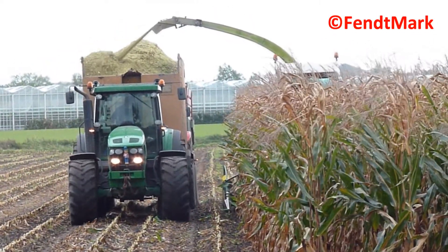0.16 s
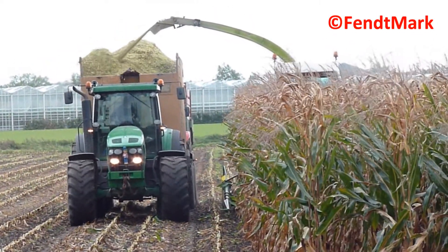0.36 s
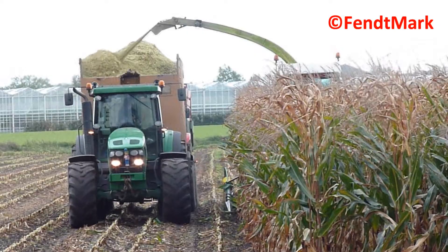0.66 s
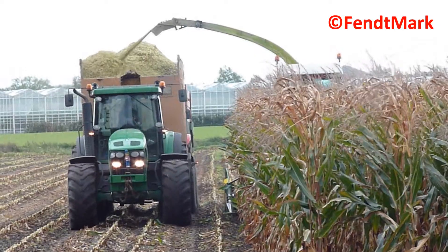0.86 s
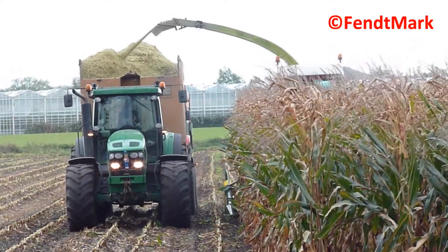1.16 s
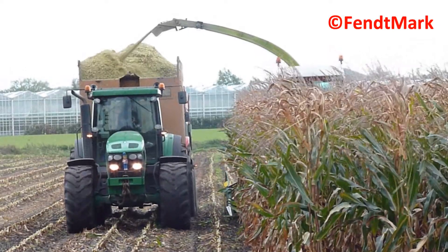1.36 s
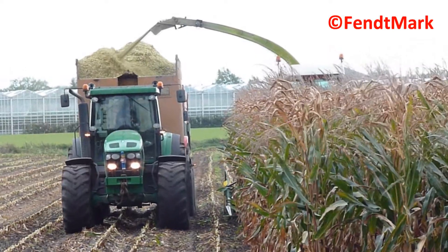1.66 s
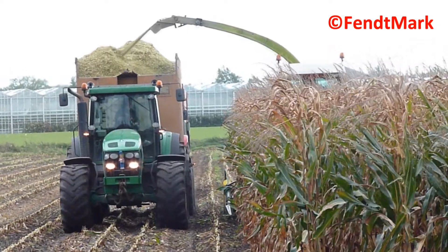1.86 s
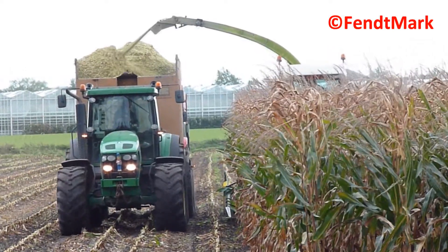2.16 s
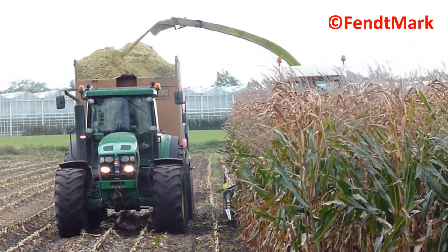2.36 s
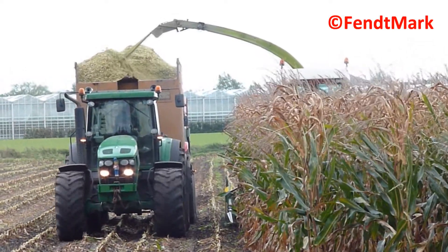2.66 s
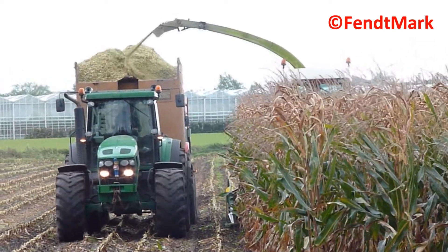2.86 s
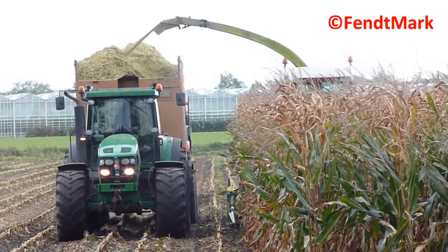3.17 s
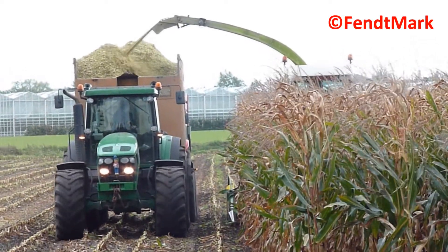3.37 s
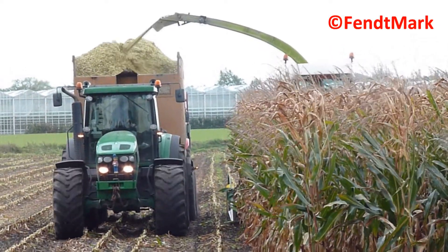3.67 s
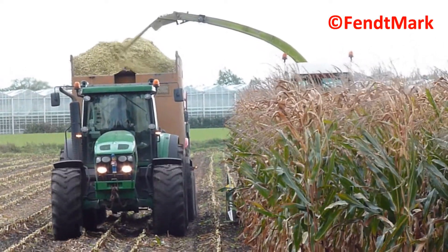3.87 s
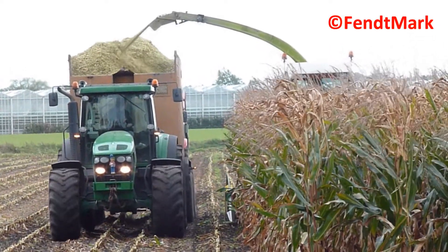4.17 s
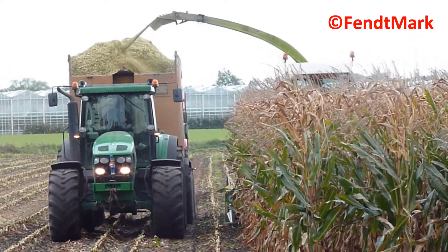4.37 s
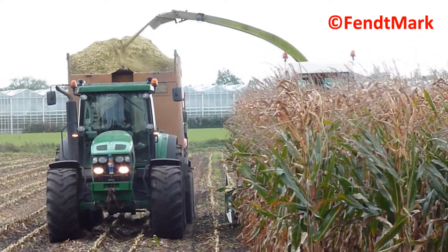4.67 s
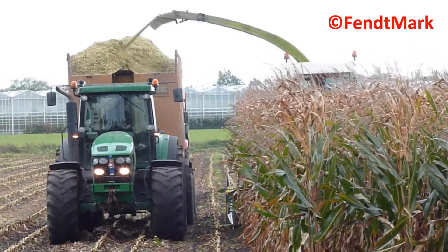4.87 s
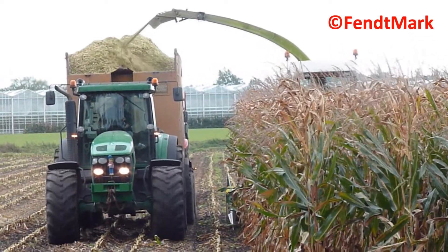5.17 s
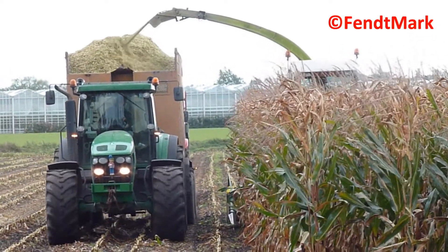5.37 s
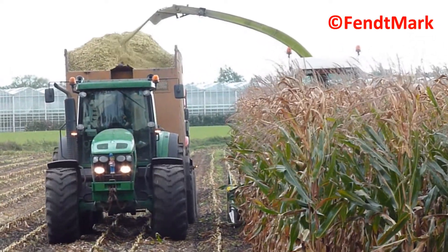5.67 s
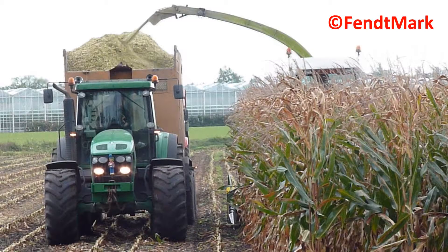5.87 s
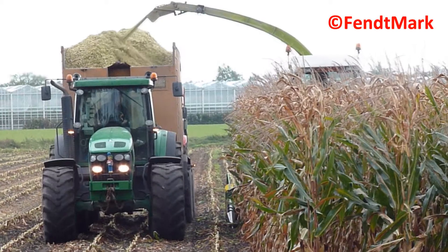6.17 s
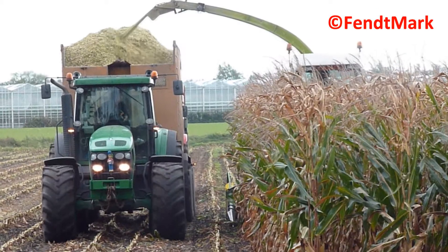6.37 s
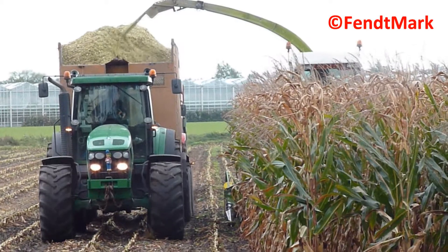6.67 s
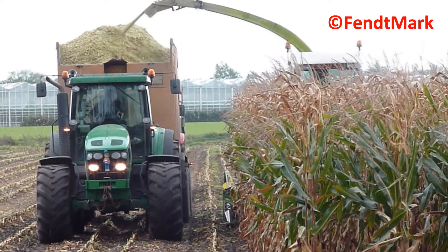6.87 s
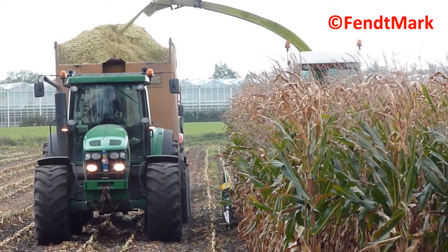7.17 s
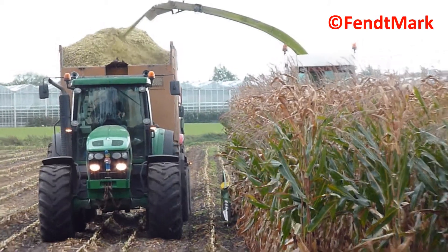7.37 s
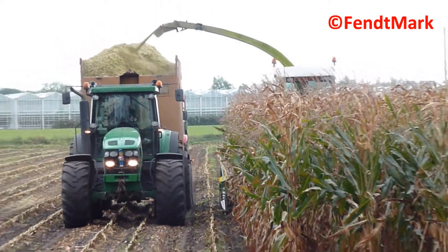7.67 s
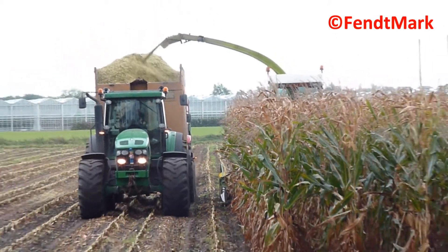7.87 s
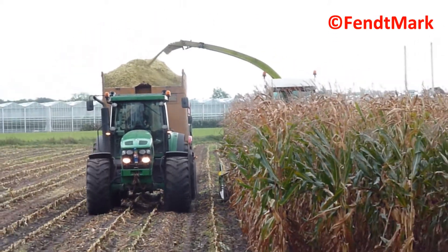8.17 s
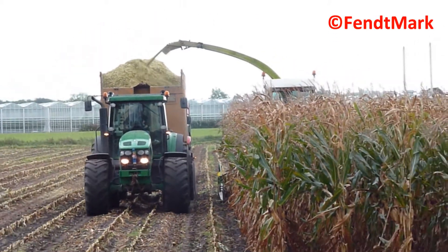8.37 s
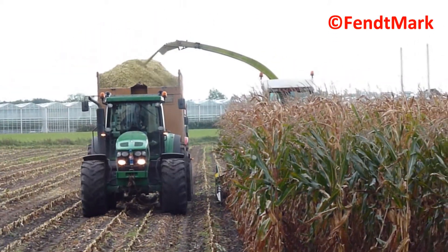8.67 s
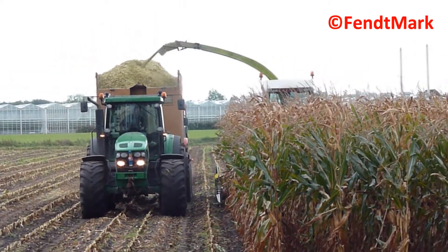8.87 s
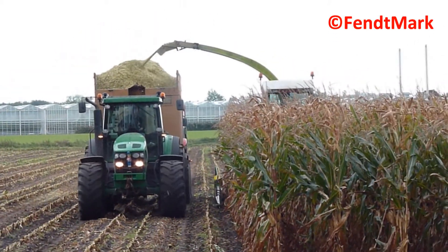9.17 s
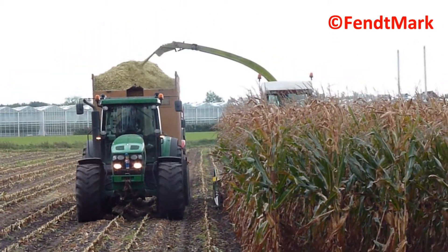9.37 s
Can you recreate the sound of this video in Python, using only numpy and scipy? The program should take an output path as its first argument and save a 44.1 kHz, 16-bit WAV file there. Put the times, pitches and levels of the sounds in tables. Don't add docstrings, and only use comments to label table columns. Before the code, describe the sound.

From 0 s a forage harvester runs at full load beside a tractor, with no pause or fade. The main whine, near 450 Hz, sits over a fluttering tone an octave lower, engine hum and a broad low-mid roar. Chains and panels clatter, while chopped maize hisses in the spout with a narrow, airy ring. Two dull cob knocks strike at about 1.3 and 1.6 s. Thick mouthfuls swell the whine, strongly at 3.2 s and repeatedly around 3.9-5.2 s, the pitch sagging slightly; the spout ring peaks near 3.1 s. Further, mostly softer knocks fall at 5.3, 5.6, 6.1 and 6.5 s, with another strong swell at 6.2 s. The spout ring thins around 7.5-8 s, then high knife overtones sing from about 8.3 s to 9 s. Noise grows gradually to the end at roughly 9.5 s as the machines approach. Open field, small stereo microphone, limited bass and treble.

```python
import sys
import numpy as np
from scipy import signal
from scipy.fft import rfft, irfft
from scipy.io import wavfile
from scipy.ndimage import uniform_filter1d

SR = 44100
rng = np.random.default_rng(int(sys.argv[2]) if len(sys.argv) > 2 else 0)


def gain_from_db(level_db):
    decades = np.asarray(level_db, float) / 20
    return 10 ** decades


def wav_record(signal):
    frames = np.transpose(np.atleast_2d(signal))
    bounded = np.clip(frames, -1, 1)
    quanta = np.round(bounded * 32767).astype(np.int16)
    wavfile.write(sys.argv[1], SR, quanta)


N = 420273
CUTS_PER_CRANK = 7.47

# (t/s, length/s, gain/dB)
MOUTHFULS = [(.75, 0.52, 4), (1.5, 0.12, 3.5), (2.2, 0.43, 3.5), (3.2, 0.46, 7), (3.62, 0.17, 4.5),
             (3.92, 0.21, 7), (4.2, 0.29, 6), (4.55, 0.37, 4.5), (4.92, 0.23, 6), (5.17, 0.28, 6),
             (5.55, .4, 3.5), (6.24, 0.19, 8), (6.48, 0.26, 4), (6.85, .15, 3.5), (7.2, .2, 4.5),
             (7.62, .12, 5.5), (7.88, 0.25, 6), (8.22, .35, 4.5), (8.63, .12, 5), (8.84, .12, 7),
             (9.37, 0.18, 3.5)]


def evened(x):
    return x / np.sqrt(np.mean(abs(x) ** 2) + 1e-20)


def read(points, hz):
    f, *values = np.transpose(points)
    return [np.interp(np.log(hz + 1), np.log(f + 1), v) for v in values]


def along(rows):
    s, value = np.transpose(rows)
    return np.interp(np.arange(N) / SR, s, value)


def swells(rows):
    t = np.arange(0, N, 64) / SR
    db = sum(gain_db * np.exp(-(2 * (t - s) / length) ** 2) for s, length, gain_db in rows)
    return np.interp(np.arange(N) / SR, t, db)


def wander(hz):
    z = rfft(rng.standard_normal(N))
    return evened(irfft(z * np.exp(-(np.fft.rfftfreq(N, 1 / SR) / hz) ** 2), N))


def tone(turns, db, rough, rough_hz):
    shake = evened(1 + rough * (wander(rough_hz) + 1j * wander(rough_hz)))
    carrier = np.exp(2j * np.pi * (turns + rng.random()))
    return gain_from_db(db) * np.sqrt(2) * (shake * carrier).real


def wash(colour, patchy_db, size=1024):
    # (f/Hz, likeness/0-1, left lead/rad, left-right level/dB)
    ports = [(450, 1, -.12, 0), (900, 0.98, 0.12, -0.3), (1700, 0.95, -0.18, -2), (2500, 0.87, 0.12, -1),
             (2930, .65, 0.82, 2), (3080, 0.97, 0.51, 10.5), (3236, .45, -0.95, 4.5), (3600, .8, -0.56, 0),
             (3750, 0.98, -1, 3.5), (3850, 0.6, -1.2, 6), (4380, 0.3, 0.013, -2.5), (5000, 0.9, -0.68, 2.5),
             (6200, .91, -1, 2), (7840, 0.4, -1.46, -1)]
    hop = size // 4
    frames, hz = N // hop + 5, np.fft.rfftfreq(size, 1 / SR)
    a, b, c, d, patches = rng.standard_normal((frames, len(hz), 5)).T
    patches = uniform_filter1d(patches, size=12, axis=0)
    patches = evened(uniform_filter1d(patches, size=12, axis=1))

    same, lead, tilt_db = (v[:, None] for v in read(ports, hz))
    apart = (hz ** 3 / (hz ** 3 + 750 ** 3))[:, None]
    same = 1 - apart * (1 - np.clip(same, 0, 1))
    left = a + 1j * b
    right = same * left + np.sqrt(1 - same ** 2) * (c + 1j * d)
    port = gain_from_db(apart * tilt_db / 2) * np.exp(.5j * apart * lead)
    z = np.array([left * port, right / port])
    z *= gain_from_db(read(colour, hz)[0][:, None] + patchy_db * patches)
    return evened(signal.istft(z, nperseg=size, noverlap=size - hop)[1][:, :N])


def knife_turns():
    # (t/s, second knife harmonic f/Hz)
    speed = [(.2, 445.5), (.65, 453), (1.1, 453), (1.65, 445.2), (2.25, 451), (2.7, 458.5), (3.1, 451.5),
             (3.5, 454.3), (3.95, 451.5), (4.25, 456), (4.7, 457.8), (4.95, 456), (5.4, 460.9),
             (5.85, 455.5), (6.2, 451), (6.7, 452.5), (8.55, 448.7), (9.05, 456)]
    sag_hz_per_db = 0.5
    hz = along(speed) - sag_hz_per_db * swells(MOUTHFULS)
    return np.cumsum(uniform_filter1d(hz, size=8000)) / SR / 2


def tractor_tones():
    # (order of the engine cycle, level/dB)
    orders = [(5, -91), (6, -79), (7, -66), (8, -58), (10, -59.5)]
    cycle_hz = 16.65
    turns = np.cumsum(cycle_hz * (1 + 0.00291 * wander(0.43))) / SR
    return sum(tone(order * turns, db, 0.15, 1.9) for order, db in orders)


def roar(flow_db, near_db, bites):
    # (f/Hz, density/dB per Hz)
    colour = [(45, -62), (70, -43.5), (110, -18), (180, 0), (226, 4.5), (270, 0), (315, -5), (395, 5),
              (440, 4.5), (480, -4), (520, 2.5), (685, 3.5), (860, -1.5), (1100, -33.5)]
    level_db = -33 + 0.34 * flow_db + 0.63 * near_db + 0.5 * bites
    return gain_from_db(level_db) * wash(colour, 1.4, size=4096)


def clatter(flow_db, near_db, bites):
    # (f/Hz, density/dB per Hz)
    colour = [(700, -26), (900, 0.5), (1100, -2), (1400, -0.5), (1700, -7), (2050, -10), (2300, -16),
              (2600, -19.5), (3000, -39)]
    level_db = -40.97 + flow_db + near_db + 0.64 * bites
    return gain_from_db(level_db) * wash(colour, 0.86)


def crop_hiss(flow_db, near_db, bites):
    # (f/Hz, density/dB per Hz)
    colour = [(2200, -27.5), (2700, -8), (3080, -3), (3400, -4.5), (3750, -2), (4200, -2.5), (5000, -2),
              (5800, -2), (6200, -1), (6900, -3), (7400, -6), (7700, -14.5), (7850, -20.5), (8100, -22.5)]
    level_db = -49 + flow_db + 0.6 * near_db + 0.64 * bites
    return gain_from_db(level_db) * wash(colour, 1.1)


def spout_ring(flow_db):
    # (f/Hz, density/dB per Hz)
    colour = [(3200, -31), (3550, -7.5), (3780, -1), (4000, -8.5), (4400, -32)]
    # (t/s, length/s, gain/dB)
    lumps = [
        (.67, .2, 3),
        (2.35, 0.23, 5),
        (3.12, .4, 8),
        (4.1, 0.34, 5.5),
        (5.2, 0.24, 3),
        (6.05, .2, 4.5),
        (7.5, .3, -6),
        (8.03, .2, -8),
    ]
    return gain_from_db(-59 + 0.9 * flow_db + swells(lumps)) * wash(colour, 0.64)


def machine_noise():
    # (t/s, level/dB re usual)
    feed = [(0, 0.5), (.7, 1.5), (1.1, 1), (1.35, -1), (1.6, 0.5), (1.88, -2.5), (2.15, 0), (3.1, 0.5),
            (3.45, -.5), (4.15, 1), (4.62, -2), (5.0, 0.5), (5.5, 1.5), (5.7, 0), (7.25, 1), (7.55, -1.5),
            (7.9, 1), (9.53, .5)]
    flow_db = along(feed)
    near_db = 0.23 * np.arange(N) / SR
    bites = wander(35)
    knife = 2 * np.pi * knife_turns()
    throb = 0.04 * np.cos(knife) + 0.045 * np.cos(2 * knife / CUTS_PER_CRANK)
    upper = clatter(flow_db, near_db, bites) + crop_hiss(flow_db, near_db, bites) + spout_ring(flow_db)
    return roar(flow_db, near_db, bites) + (1 + throb) * upper


def knocks():
    # (t/s, peak level/dB)
    cobs = [
        (1.295, -17),
        (1.607, -18),
        (5.26, -17.5),
        (5.56, -22.5),
        (6.08, -22.5),
        (6.537, -23),
    ]
    ring_hz, t60_s, gain_db = 640, 0.018, 2
    t, blows = np.arange(2000) / SR, np.zeros(N)
    for s, db in cobs:
        blows[round(s * SR)] = gain_from_db(db + gain_db)
    onset = np.minimum(t / 0.0017, 1)
    ring = np.sin(2 * np.pi * ring_hz * t) * gain_from_db(-60 * t / t60_s) * onset
    return signal.oaconvolve(blows, ring)[:N]


def harvester_tones():
    # (crank order, level/dB)
    engine = [(2, -73.5), (3, -85), (5, -61.5), (6, -56), (10, -48.5), (11.25, -58), (13, -55)]
    # (t/s, length/s, gain/dB)
    beats = [(.05, .25, -11), (.32, 0.13, 2.5), (.6, 0.29, -23), (.8, .1, 7.5), (1.0, 0.086, -6.5),
             (1.3, 0.089, -0.5), (1.75, 0.5, 4.5), (2.11, 0.16, -15), (2.8, 0.091, 4.5), (3.15, 0.17, -5),
             (3.6, 0.76, 3), (4.07, 0.21, -21), (4.58, .3, 5), (4.97, 0.19, -4), (5.38, .15, -11),
             (5.57, .18, 6), (6.12, .1, -5), (6.7, 0.62, 2), (7.22, .15, -18), (7.48, 0.2, 7.5),
             (7.82, .15, -5), (8.63, 0.079, -6.5), (8.83, 0.097, -10), (9.1, 0.18, 2), (9.38, 0.19, -6.5)]
    # (t/s, length/s, gain/dB)
    third = [(.4, .35, 12.5), (1.0, .4, 5), (1.6, 0.39, 5), (2.7, 0.42, 6.5), (4.05, 0.27, 8), (4.6, .4, 6),
             (5.05, .3, 9), (5.45, .45, 13), (6.25, 0.25, 7), (6.9, 0.46, 7), (8.6, 0.61, 10.5),
             (9.2, .5, 10)]
    fifth = [
        (1.45, .5, 4),
        (2.4, 0.98, 9.8),
        (3.45, 1.1, 11.8),
        (4.6, .7, 8),
        (5.25, 0.57, 10),
        (7.3, .4, 7),
        (8.3, 1.2, 11),
    ]
    sixth = [
        (.6, .5, 5),
        (2.1, .5, 4),
        (4.95, .5, 7.7),
        (5.9, .5, 5),
        (7.2, 1.2, 8),
        (8.3, 0.71, 11),
        (8.95, 0.63, 11),
    ]
    knife = knife_turns()
    out = tone(knife, -37 + swells(beats), 0.28, 16)
    out += tone(2 * knife, -33 + swells(MOUTHFULS), 0.14, 14)
    out += tone(3 * knife, -48 + swells(third), 0.52, 12)
    out += tone(5 * knife, -58 + swells(fifth), 0.63, 12)
    out += tone(6 * knife, -60.3 + swells(sixth), 0.41, 15)
    return out + sum(tone(order * knife / CUTS_PER_CRANK, db, 0.17, 3.0) for order, db in engine)


def scene():
    ahead = tractor_tones() + knocks() + harvester_tones()
    lean = signal.sosfiltfilt(signal.butter(2, 330, "high", fs=SR, output="sos"), ahead)
    return machine_noise() + ahead + gain_from_db(-27.5) * np.array([-lean, lean])


def low_pass(x):
    return signal.sosfilt(signal.butter(12, 8260, fs=SR, output="sos"), x)


def record(dry):
    # (f/Hz, width/Hz)
    notches = [(2600, 255), (4600, 710), (5428, 350), (7905, 800)]
    dry = signal.sosfilt(signal.butter(4, 52, "high", fs=SR, output="sos"), dry)
    for hz, width in notches:
        dry = signal.lfilter(*signal.iirnotch(hz, hz / width, SR), dry)
    edge = signal.firwin(1501, 8015, window=("kaiser", 8), fs=SR)
    return low_pass(signal.oaconvolve(dry, edge[None], "same"))


dry = scene()
out = record(dry)
wav_record(out)
```